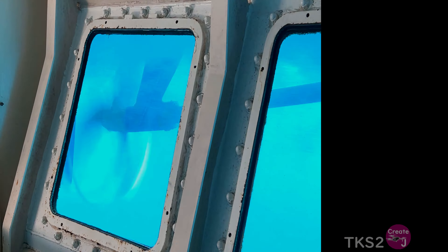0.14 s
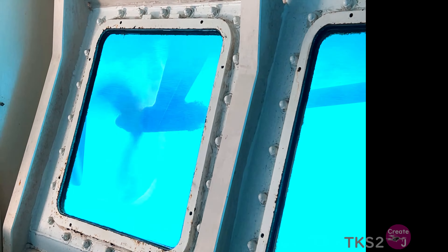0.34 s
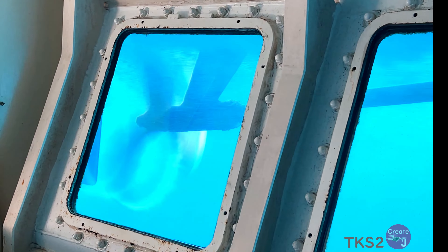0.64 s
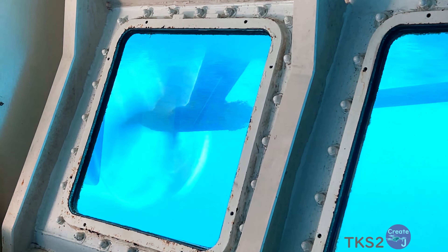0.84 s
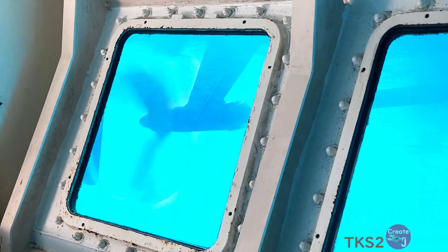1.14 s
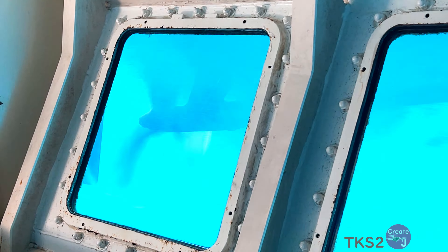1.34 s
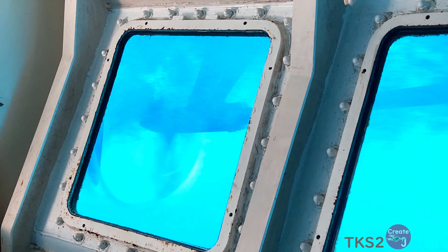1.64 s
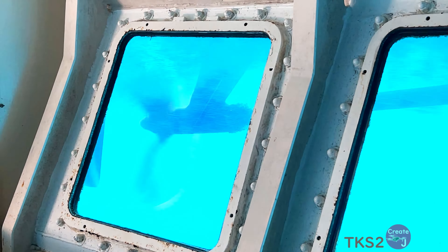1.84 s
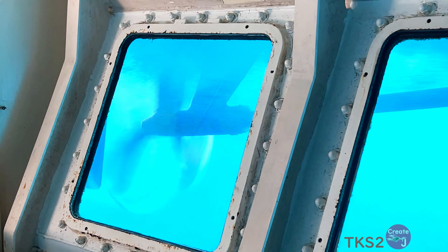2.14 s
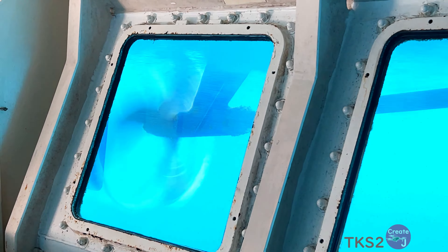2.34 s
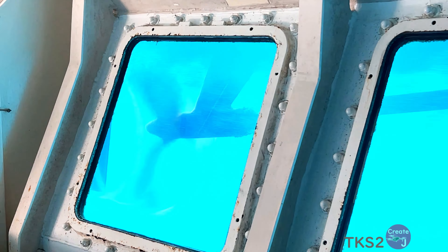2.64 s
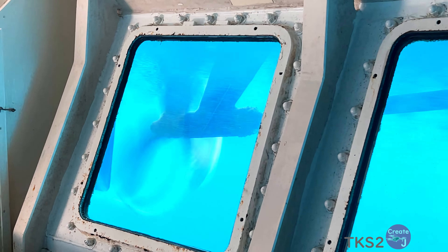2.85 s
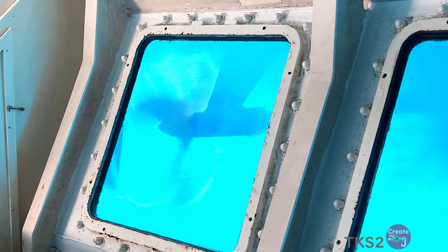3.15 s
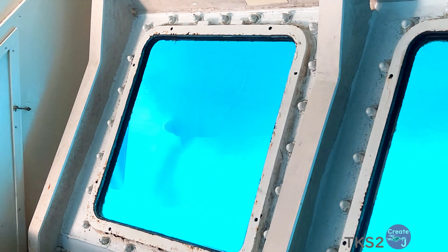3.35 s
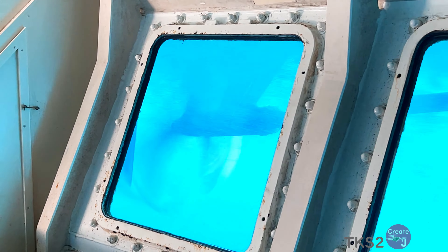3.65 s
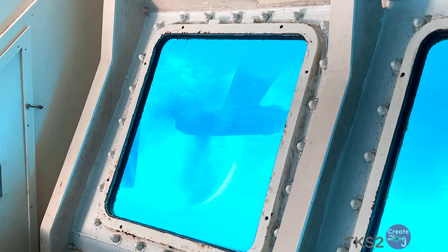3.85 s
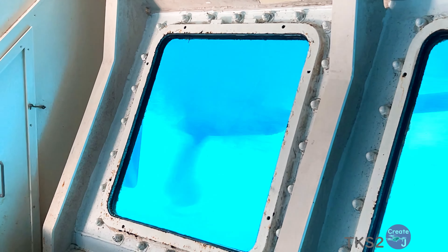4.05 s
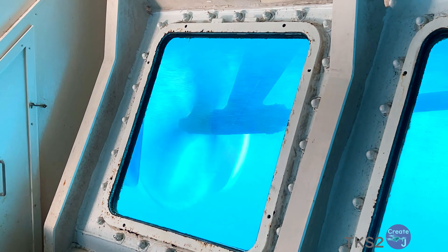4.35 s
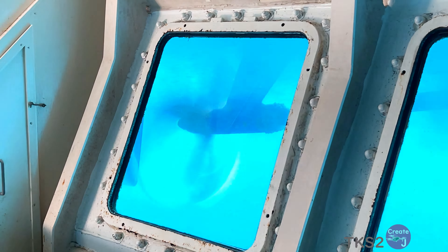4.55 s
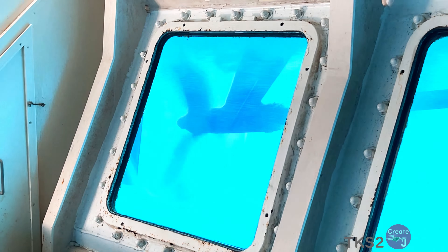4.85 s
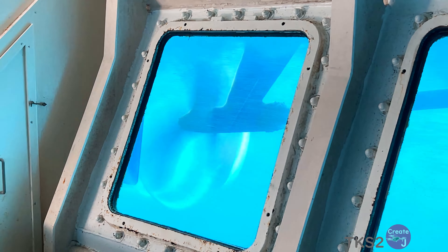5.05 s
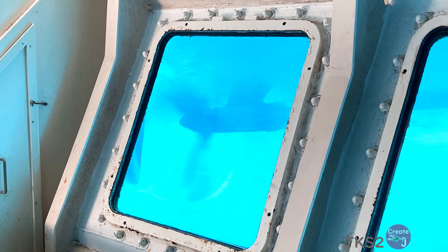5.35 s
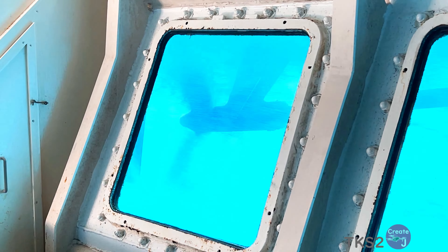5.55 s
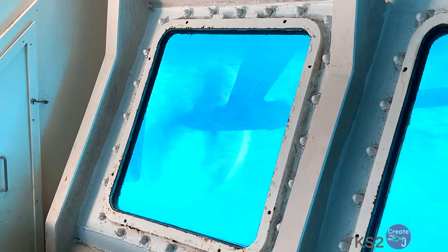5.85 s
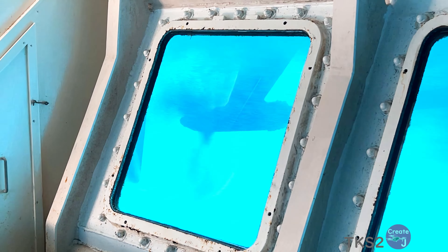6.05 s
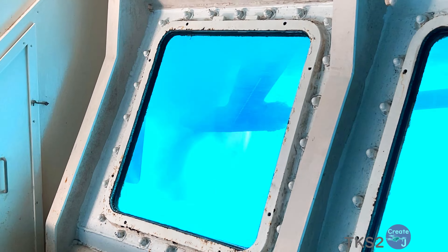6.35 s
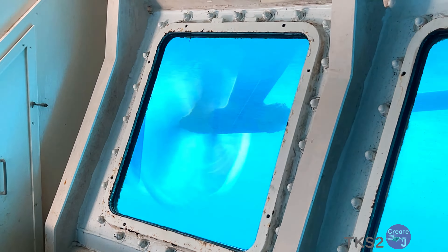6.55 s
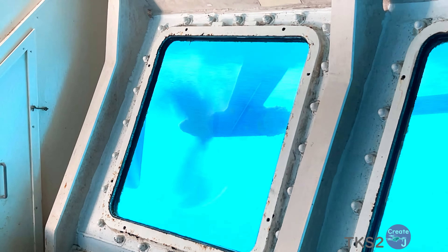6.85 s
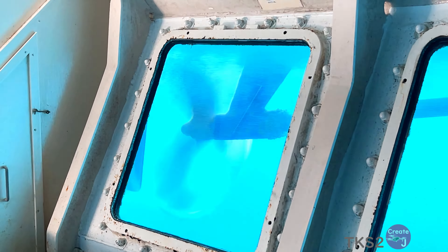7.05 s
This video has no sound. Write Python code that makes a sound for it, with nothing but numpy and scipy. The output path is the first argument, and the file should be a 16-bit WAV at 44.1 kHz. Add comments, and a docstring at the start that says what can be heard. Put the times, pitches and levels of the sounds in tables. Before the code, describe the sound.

Inside a boat's steel cabin below the waterline, two idling diesel engines throb and drone steadily, with gear whine and faint water fizz.

```python
"""A steel cabin below a boat's waterline, heard in stereo, with a near and a far six-cylinder diesel idling.
Each engine repeats a knock built from its orders, with wavering echoes and clatter; their speeds differ a little.
Their orders beat together and with a deep drive-line hum; two orders boom, gears whine and a thin whistle swells.
Shaped noise makes the hull's rumble and the fizz of propeller-churned water along the plating.
Brief unsteady tones are faint squeaks of metal."""
import sys
import numpy as np
from scipy import signal
from scipy.fft import rfft, irfft
from scipy.io import wavfile

SR = 44100
rng = np.random.default_rng(int(sys.argv[2]) if len(sys.argv) > 2 else 0)


def transcribe(signal):
    """Save signal, clipped to [-1, 1], as a 16-bit WAV file at the path in sys.argv[1]."""
    frames = np.atleast_2d(signal).T
    limited = np.clip(frames, -1, 1)
    pcm = np.round(limited * 32767).astype(np.int16)
    wavfile.write(sys.argv[1], SR, pcm)


N = 317520
TIME = np.arange(N) / SR  # seconds

# Engine cycles (two crank turns) a second, near and far engine.
NEAR_HZ, FAR_HZ = 6.669, 6.8009
# Orders of the near engine that the hull carries best.
# Each row: multiple of the cycle rate, level in dB before the engine's own trim, left minus right in dB.
NEAR_ORDERS = [(6, -45, 0), (9, -49, 1), (12, -29, 1), (13, -35, 4), (17, -48, 2), (18, -47, 4),
               (19, -49, 1), (20, -51, 3), (21, -42, 0), (28, -39, 3), (30, -40.5, -1), (31, -47, 0),
               (33, -53, 7), (34, -55, 2), (35, -58, 0), (36, -46, -2), (38, -55, 8), (39, -55, 8),
               (40, -48, 1), (42, -40, -2), (43, -46, 2), (44, -42.5, 2), (45, -49.5, 8), (46, -53, 3),
               (47, -48.5, 1), (48, -44.5, -1), (49, -53, 2), (50, -56, 7), (56, -50.5, -3), (58, -49, 1),
               (59, -57, 0), (61, -56, 0), (63, -54, 6), (66, -60, 0), (67, -60, 0), (69, -60, 0),
               (70, -59, 0), (72, -55.5, 5), (74, -56.5, 2), (75, -54.5, 0), (86, -60, 0), (126, -62, 0),
               (207, -60, 1)]
# The same for the far engine.
# Each row: multiple of the cycle rate, level in dB before the engine's own trim, left minus right in dB.
FAR_ORDERS = [(6, -43, 0), (9, -46, 0), (12, -37, -1), (15, -34, 5), (21, -50, -2), (24, -34.5, 1),
              (27, -44, 3), (30, -48, 0), (33, -46, -2), (36, -44, 4), (48, -57, 2), (50, -54, 1),
              (51, -53, 5), (54, -54, -1), (78, -60, 0), (93, -62, 0), (117, -64, 0), (126, -67, 0),
              (138, -63, 7), (141, -66, 0), (144, -58, -5), (147, -61, -9), (150, -56.5, 4), (156, -63, -2),
              (159, -67, 0), (160, -64, 9), (168, -68, 2), (174, -67, 0), (177, -66, 0), (180, -61, 2),
              (186, -56, -1), (192, -67, -8), (198, -64, 0), (200, -64, 0), (201, -63, 0), (213, -66, 0),
              (216, -64, 1), (222, -68, -4), (243, -69, 0), (249, -68, 0), (258, -65, 0), (264, -67, 0),
              (282, -67, 0), (318, -68, 0), (366, -72, 0), (414, -72, 0), (444, -74, 0), (516, -73, 0),
              (522, -73, 0), (540, -74, 0), (558, -77, 0)]
# Clatter of the machinery through the bulkhead. Each row: frequency in Hz, density in dB per Hz before trim.
CLATTER = [(200, -71), (550, -72.5), (780, -72.5), (1000, -75.5), (1380, -72), (1600, -77.5), (2100, -77),
           (2900, -80), (3500, -88), (4500, -99.5), (9000, -115)]
# Brief surges of the clatter. Each row: centre in seconds, time from the centre to 1/e in seconds, rise in dB.
SURGES = [(.9, .15, 1), (1.88, .07, 0.5), (3.08, 0.027, 2.5), (3.75, 0.074, 1.5), (5.5, 0.13, 0),
          (6.92, .1, 1)]

# The two booming orders of the near engine, as multiples of its cycle rate.
DRONE_ORDERS = (24, 27)
# Their slow swells. Each row: time in seconds, lower order in dB, upper order in dB, both before trim.
DRONE_LEVELS = [(.3, -30.5, -29), (1.05, -29, -30), (1.55, -30, -35), (1.9, -29.5, -30),
                (2.4, -29.5, -29.5), (3, -30, -31.5), (3.7, -32, -32.5), (4.25, -29.5, -27),
                (4.65, -27.5, -30.5), (5.1, -28, -34.5), (5.6, -28.5, -30), (6.35, -29, -30.5),
                (7.1, -29.5, -32.5)]

# A deep drive-line hum, with other steady lines, several of them orders of the far engine.
# Each row: frequency in Hz, level in dB before trim and waver, left minus right in dB.
STEADY_LINES = [(67.62, -25, 1), (82.3, -42, 0), (154.3, -48, 0), (387.7, -49, 2), (775.3, -60, -4),
                (2176.7, -69, 0), (2651.9, -66, 0), (2904.6, -68, 0), (5688.8, -80, 0)]
GEAR_HZ = 362.8  # mesh tone
# Level of the steady gear whine, wandering by chance against noise and neighbouring lines.
# Each row: time in seconds, mesh tone in dB, its octave in dB, both before trim and a faster wander.
GEAR_LEVELS = [(.3, -33.5, -52), (.85, -40.5, -49.5), (1.2, -41, -53.5), (1.45, -36.5, -45.5),
               (1.75, -38, -54), (2.3, -39.5, -46.5), (2.65, -37, -55), (2.85, -36, -47),
               (3.05, -44.5, -51.5), (3.7, -40, -48), (3.9, -39, -54), (4.1, -38, -49.5), (4.6, -44.5, -51),
               (5.1, -36.5, -49.5), (5.45, -46.5, -47), (5.8, -37.5, -51.5), (6.5, -37.5, -51),
               (7.2, -37, -48.5)]
# Place of the gear whine: left minus right in dB, for the mesh tone and for its octave.
GEAR_PAN_DB = (-6, 5)

# A thin whistle turns with the far engine and stays faint between its swells.
WHISTLE_HZ = 300 * FAR_HZ
WHISTLE_FAINT_DB, WHISTLE_RISE_S, WHISTLE_FALL_S = -61.5, 0.25, 0.47
# Swells of the whistle.
# Each row: start in seconds, time until the fall begins in seconds, held level in dB before waver.
WHISTLE_SWELLS = [(.45, 0.41, -59), (2.05, .7, -57.5), (4.45, 1, -55.5), (5.9, 1, -56)]

# Faint, brief squeaks of metal.
# Each row: centre in seconds, time from the centre to 1/e in seconds, mean pitch in Hz, level in dB before trim.
SQUEAKS = [(.92, .06, 3650, -61), (1.11, 0.055, 3700, -61), (1.9, 0.055, 1571, -48),
           (3.71, 0.083, 880, -50)]

# Rumble of hull and cabin air with their broad resonances.
# Each row: frequency in Hz, density in dB per Hz before trim.
HULL = [(20, -80), (33, -75.5), (39, -53), (46, -52.5), (54, -61), (63, -49.5), (72, -49), (82, -44.5),
        (91, -57), (110, -50), (132, -58.5), (146, -57), (158, -53.5), (169, -54), (181, -52.5),
        (198, -51.5), (208, -58), (226, -57.5), (262, -64), (284, -55.5), (316, -60.5), (335, -67.5),
        (368, -58), (410, -63.5), (450, -64), (900, -77), (2500, -115)]
# Water fizzing along the plating. Each row: frequency in Hz, density in dB per Hz before trim.
FIZZ = [(1000, -110), (3800, -86.5), (4600, -91), (5650, -90), (6400, -92), (7300, -92), (8500, -95),
        (9100, -99), (11500, -101), (14000, -101), (15600, -105)]
# Bursts of bubbles. Each row: centre in seconds, time from the centre to 1/e in seconds, rise in dB.
BUBBLES = [(.8, .06, 1.5), (0.917, 0.02, 5), (1.513, 0.0085, 3.5), (2.64, .025, 3), (3.77, 0.018, 1.5),
           (3.84, .02, 2)]
# The fizz starts slightly low. Each row: time in seconds, change of level in dB.
FIZZ_START = [(.26, -0.5), (.55, -0.5), (.75, 0)]

# Narrow resonances, likely of steel panels. Each row: centre in Hz, half width in Hz, rise in dB.
PANELS = [(603, 7.6, 3.5), (725, 15, 3), (1380, 45, 2), (1500, 18, 1.5), (1757, 34, 4), (3140, 17, 3.5),
          (3460, 12, 3), (4010, 55, 2), (5620, 11, 1.5), (5730, 12, 2), (6070, 25, 1.5), (7220, 50, 5.5)]
# Standing waves ripple the spectrum of all noise, mostly above the hull's own resonances.
RIPPLE_DB, RIPPLE_WIDTH_HZ, RIPPLE_FROM_HZ = 2.23, 9, 400
# Stereo width: narrow in the bass, wide in the mids, narrow again in the low treble, wide near the top.
# Each row: frequency in Hz, side minus mid in dB.
WIDTH = [(40, -28), (70, -24.5), (93, -9.5), (135, -11), (180, -17.5), (240, -6), (400, -6), (700, -1),
         (1290, -6), (1800, -18), (2200, -44), (2900, -18.5), (4000, -18), (4650, -39.5), (7200, -43.5),
         (7800, -7.5), (9000, 0.5), (11500, 2.5), (13500, -18.5), (15200, 1)]
STRAY = 0.4  # share of the stereo width that even a centred line has

# The sound cuts in and swells to its full level. Each row: time in seconds, gain in dB.
FADE = [(.2605, -84), (.2625, -5.7), (.45, -3), (.74, .4), (6.4, .3), (7.2, .7)]
EDGE_HZ, OPPOSED_HZ = 15750, (9100, 10950)  # upper band limit; treble band in opposite phase


def engine(cycle_hz, orders, level_db, rattle_db, alike_db, clatter_db, waver, count=4):
    """A governed diesel: a repeating knock, wavering echoes of it, and loose clatter."""
    hunting = spread(0.00048 * drift(0.93))  # in cycles: the governor hunts very slightly
    place = (cycle_hz * TIME + hunting) % 1
    hz, lines = order_lines(cycle_hz, orders, level_db, rattle_db, alike_db)

    # the cabin's standing waves shift as the boat moves, and short waves feel it most
    share = np.clip(waver * hz / (hz + 700), 0, 0.95)
    direct = knock(place, lines * np.sqrt(1 - share ** 2))
    # the echoes trade a steady power among them
    paths = np.array([drift(2.4) for _ in range(count)])
    paths = paths / np.linalg.norm(paths, axis=0)
    echoes = sum(knock(place, lines * share) * spread(path) for path in paths)

    flicker = spread(gain_of(clatter_db + 0.7 * drift(21)))
    clatter = noise(CLATTER) * gain_of(bumps(SURGES)) * flicker
    return direct + echoes + clatter


def order_lines(cycle_hz, orders, level_db, rattle_db, alike_db, size=16384):
    """Mid and side height of every order: a few strong ones above a rattle coloured by hull and bulkhead."""
    hz = np.arange(size // 2 + 1) * cycle_hz
    colour = np.hypot(gain_of(read(HULL, hz)), gain_of(read(CLATTER, hz)))
    # the rattle thins out below 500 Hz and above 4 kHz
    mid = gain_of(rattle_db) * colour * hz / np.hypot(hz, 500) / np.hypot(1, hz / 4000)
    # the cylinders knock much alike, so every third order stands out
    mid[::3] *= gain_of(alike_db)
    ratio = gain_of(read(WIDTH, hz)) * np.exp(2j * np.pi * rng.random(len(hz)))

    order, db, pan_db = np.transpose(orders)
    order = order.astype(int)
    mid[order] = gain_of(db + level_db)
    ratio[order] = placed(pan_db, hz[order])
    return hz, np.array([mid, mid * ratio])


def knock(place, lines):
    """Plays one engine cycle, built from its mid and side orders, over and over; place runs from 0 to 1."""
    size = 2 * (lines.shape[1] - 1)
    phases = np.exp(2j * np.pi * rng.random(lines.shape[1]))
    cycles = irfft(lines * phases) * size / np.sqrt(2)
    grid = np.arange(size + 1) / size
    # the first sample is repeated at the end to close the loop
    return np.array([np.interp(place, grid, np.append(cycle, cycle[0])) for cycle in cycles])


def drone(level_db, clock_s=0.00005):
    """Two orders of the near engine boom in the cabin, swelling and sinking slowly."""
    s, *levels_db = np.transpose(DRONE_LEVELS)
    clock = TIME + spread(clock_s * drift(0.23))
    boom = 0
    for order, db in zip(DRONE_ORDERS, levels_db):
        hz = order * NEAR_HZ
        gain = gain_of(level_db + np.interp(TIME, s, db))
        boom = boom + tone(hz * clock, hz, gain, pan_db=1.5)
    return boom


def hum_and_whine(level_db, waver_db, gear_db, wander_db=1.9):
    """Hum, steady lines and gear whine share one slight unsteadiness of speed; their levels wander by chance."""
    clock = TIME + spread(0.00009 * drift(1.0))
    sound = 0
    for hz, db, pan_db in STEADY_LINES:
        # higher lines waver more than the hum
        gain = wavering(db + level_db, waver_db * (hz / STEADY_LINES[0][0]) ** 0.27)
        sound = sound + tone(hz * clock, hz, gain, pan_db)

    s, *levels_db = np.transpose(GEAR_LEVELS)
    for multiple, db, pan_db in zip((1, 2), levels_db, GEAR_PAN_DB):
        hz = multiple * GEAR_HZ
        wander = spread(gain_of(gear_db + wander_db * drift(12)))
        sound = sound + tone(hz * clock, hz, gain_of(np.interp(TIME, s, db)) * wander, pan_db)
    return sound


def whistle(waver_db=1.8):
    """One high order of the far engine, perhaps from its timing gears; each swell rises, holds and falls back."""
    level_db = np.full(N, float(WHISTLE_FAINT_DB))
    for start, length, db in WHISTLE_SWELLS:
        rise = (TIME - start) / WHISTLE_RISE_S
        fall = 1 - (TIME - start - length) / WHISTLE_FALL_S
        level_db += (db - WHISTLE_FAINT_DB) * np.clip(np.minimum(rise, fall), 0, 1)
    clock = TIME + spread(0.00006 * drift(0.91))
    gain = gain_of(level_db) * wavering(0, waver_db)
    return tone(WHISTLE_HZ * clock, WHISTLE_HZ, gain, pan_db=0.0)


def squeaks(level_db, waver_hz=9):
    """Something metal rubs now and then, sounding one unsteady note."""
    sound = 0
    for s, length, hz, db in SQUEAKS:
        turns = hz * TIME + np.cumsum(spread(waver_hz * drift(25))) / SR
        swell = np.exp(-((TIME - s) / length) ** 2)
        sound = sound + tone(turns, hz, gain_of(level_db + db) * swell, pan_db=4)
    return sound


def water(rumble_db, fizz_db, churn_db, flicker_db):
    """The propeller's wash shakes the hull and sweeps bubbles along it."""
    rumble = noise(HULL) * spread(gain_of(rumble_db + churn_db * drift(15)))
    swell_db = bumps(BUBBLES) + np.interp(TIME, *np.transpose(FIZZ_START))
    fizz = noise(FIZZ) * gain_of(fizz_db + swell_db + spread(flicker_db * drift(16)))
    return rumble + fizz


def noise(spectrum):
    """Mid and side noise of a given density, ringing panels and cabin, with its width set band by band."""
    hz = np.fft.rfftfreq(N, 1 / SR)
    ring_db = sum(db / (1 + ((hz - centre) / width) ** 2) for centre, width, db in PANELS)
    standing = rng.standard_normal(size=8192)
    ripple_db = RIPPLE_DB * np.interp(hz / RIPPLE_WIDTH_HZ, np.arange(len(standing)), standing)
    ripple_db *= hz / np.hypot(hz, RIPPLE_FROM_HZ)
    density = gain_of(read(spectrum, hz) + ring_db + ripple_db)
    bins = rfft(rng.standard_normal((2, N))) * density * np.sqrt(SR / 2)
    bins[1] *= gain_of(read(WIDTH, hz))
    return irfft(bins, N)


def tone(turns, hz, gain, pan_db):
    """One line as mid and side, its phase given in turns from a random start."""
    angle = (2 * np.pi * ((turns + rng.random()) % 1)).astype(np.float32)
    ratio = placed(pan_db, hz)
    mid = np.cos(angle)
    side = ratio.real * mid + ratio.imag * np.sin(angle)
    return np.sqrt(2) * gain * np.array([mid, side])


def placed(pan_db, hz):
    """Side-to-mid ratio: standing waves shift a line's phase between the sides as well as lean it to one."""
    lean = (gain_of(pan_db) - 1) / (gain_of(pan_db) + 1)
    shift = np.hypot(lean, STRAY * gain_of(read(WIDTH, hz)))
    return lean + 1j * rng.choice([-1, 1], np.shape(hz)) * shift


def bumps(events):
    """Level in dB of a table of brief, rounded rises."""
    return sum(db * np.exp(-((TIME - s) / length) ** 2) for s, length, db in events)


def wavering(db, waver_db):
    """A gain that wanders slowly, with little movement above about 3 Hz."""
    return spread(gain_of(db + waver_db * drift(3.1)))


def drift(rate_hz, count=720):
    """Slow chance of unit rms on a coarse time grid, with little in it above the given rate."""
    hz = np.fft.rfftfreq(count, TIME[-1] / count)
    lowpass = (hz > 0) / (1 + (hz / rate_hz) ** 4)
    return evened(irfft(rfft(rng.standard_normal(count)) * lowpass))


def spread(coarse):
    """Stretches a coarse control over every sample."""
    return np.interp(TIME, np.linspace(0, TIME[-1], len(coarse)), coarse)


def read(points, hz):
    """Reads a table along a log-frequency axis."""
    f, value = np.transpose(points)
    return np.interp(np.log(hz + 1), np.log(f + 1), value)


def evened(x):
    """Scales to unit rms."""
    return x / np.sqrt(np.mean(abs(x) ** 2) + 1e-20)


def gain_of(db):
    """Decibels to a factor."""
    return 10 ** (np.asarray(db) / 20)


def scene():
    """All sources as mid and side, then left and right; the wash leans a little to the left."""
    near = engine(NEAR_HZ, NEAR_ORDERS, level_db=-0.5, rattle_db=0.5, alike_db=0.5,
                  clatter_db=-5.0, waver=0.64)
    far = engine(FAR_HZ, FAR_ORDERS, level_db=0.44, rattle_db=-3.5, alike_db=5.5,
                 clatter_db=-5.5, waver=0.72)
    engines = near + far + drone(level_db=0.2) + whistle()
    steady = hum_and_whine(level_db=-0.03, waver_db=0.77, gear_db=-1.0)
    wash = water(rumble_db=-2, fizz_db=-1.57, churn_db=0.5, flicker_db=0.5)
    mid, side = engines + steady + squeaks(level_db=0.5) + wash

    lowpass = signal.butter(1, 1200, fs=SR, output="sos")
    side = side + 0.08 * signal.sosfiltfilt(lowpass, wash[0])
    return np.array([mid + side, mid - side])


def record(dry):
    """A fade-in; in one treble band the channels are in opposite phase; then the upper band limit."""
    faded = dry * gain_of(np.interp(TIME, *np.transpose(FADE)))
    # taking out what both channels share leaves only their difference in the band
    band = signal.firwin(101, OPPOSED_HZ, pass_zero=False, fs=SR)
    opposed = faded - signal.oaconvolve(faded.mean(0), band, "same")
    lowpass = signal.firwin(511, EDGE_HZ, window=("kaiser", 9), fs=SR)
    return signal.oaconvolve(opposed, lowpass[None], "same")


dry = scene()
out = record(dry)
transcribe(out)
```